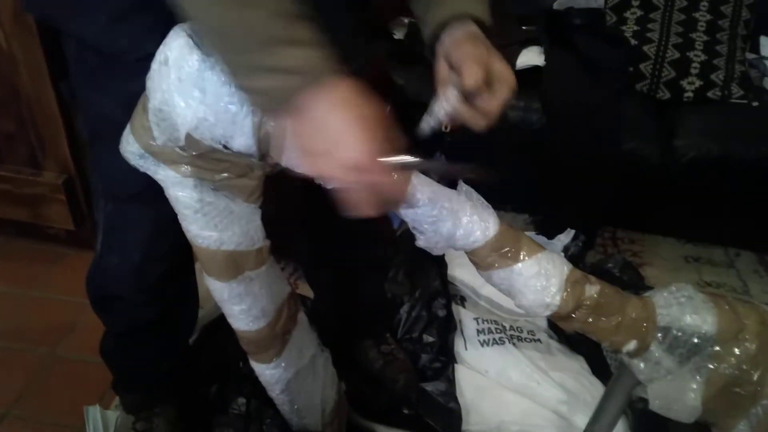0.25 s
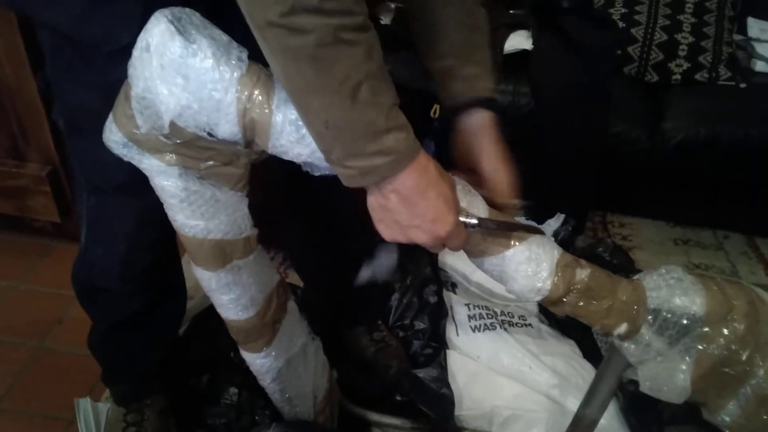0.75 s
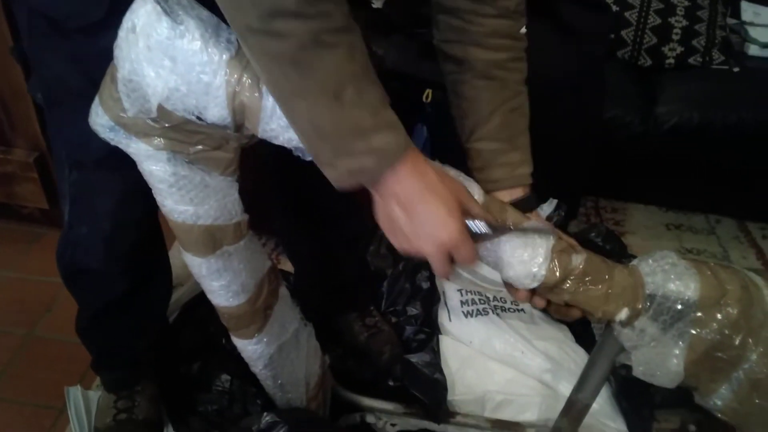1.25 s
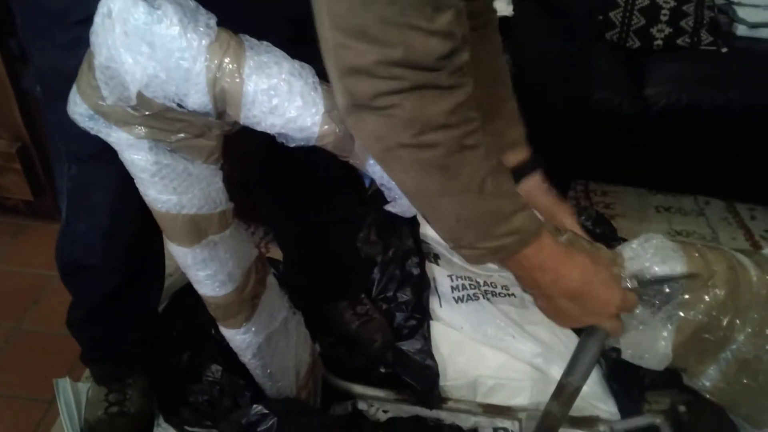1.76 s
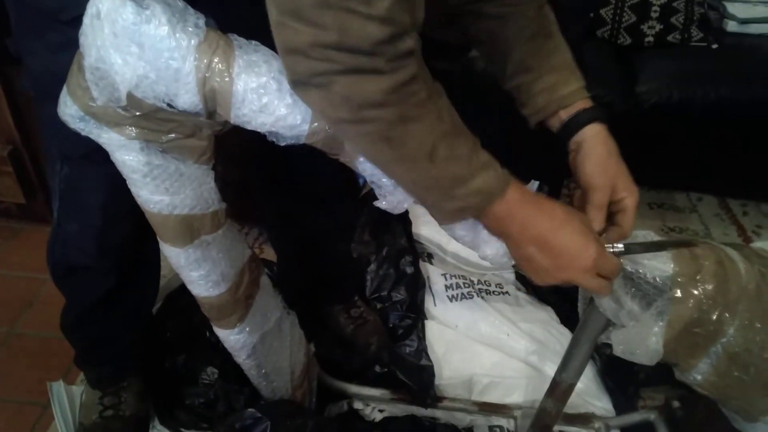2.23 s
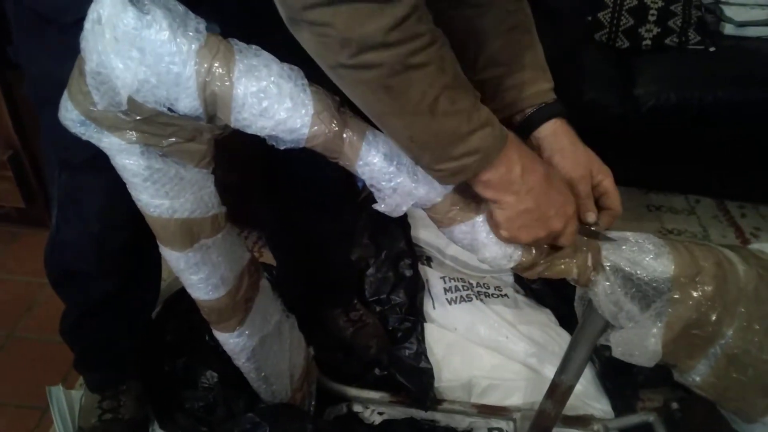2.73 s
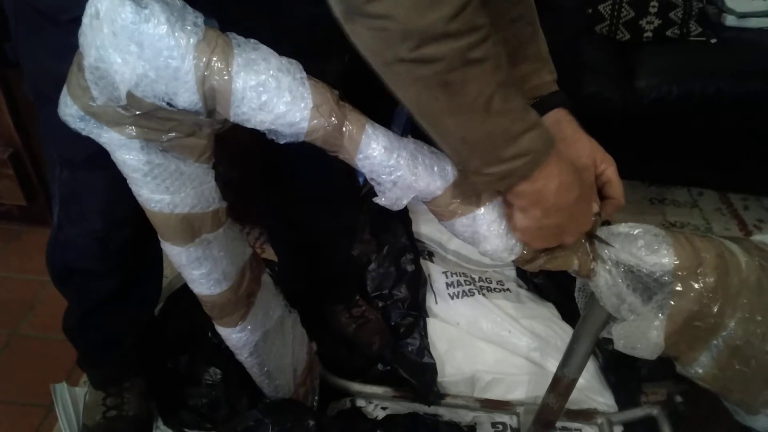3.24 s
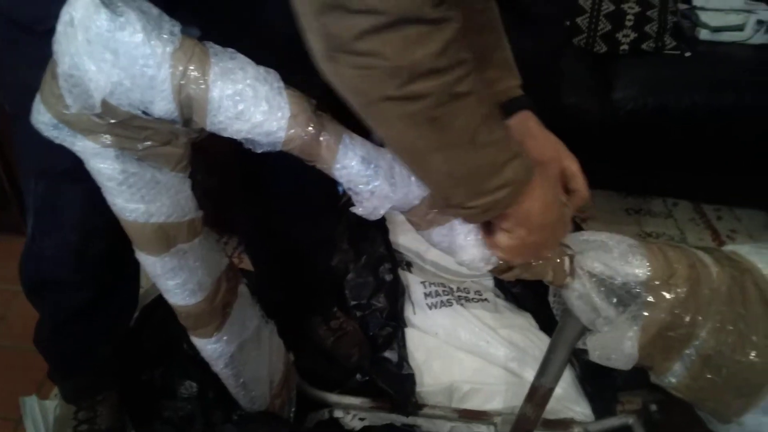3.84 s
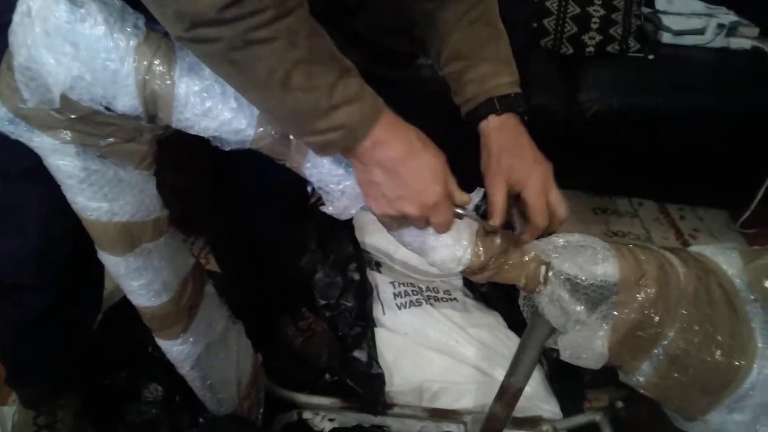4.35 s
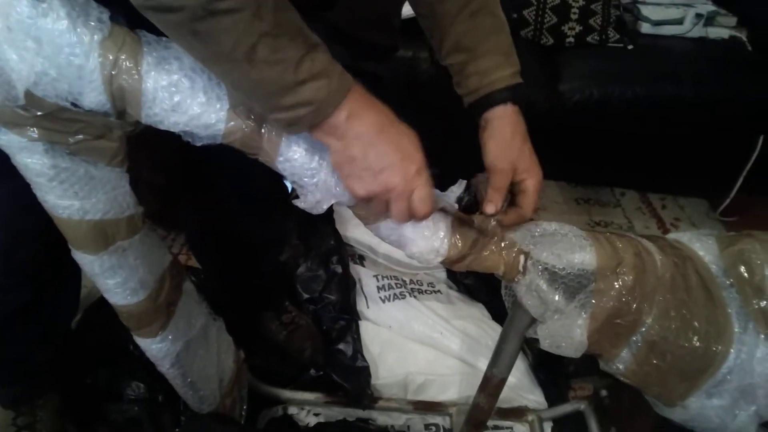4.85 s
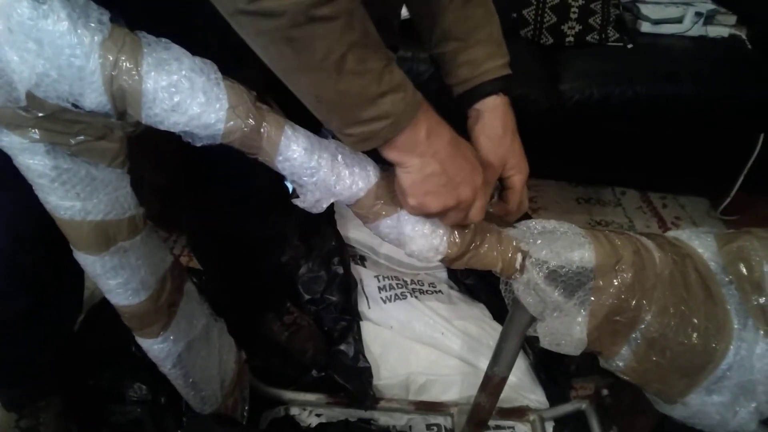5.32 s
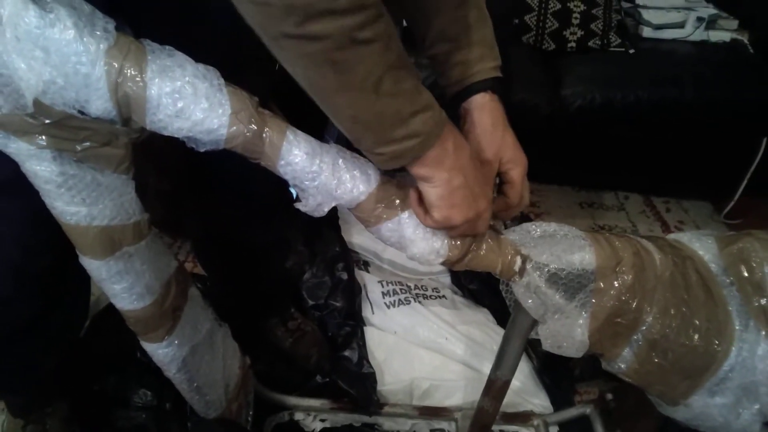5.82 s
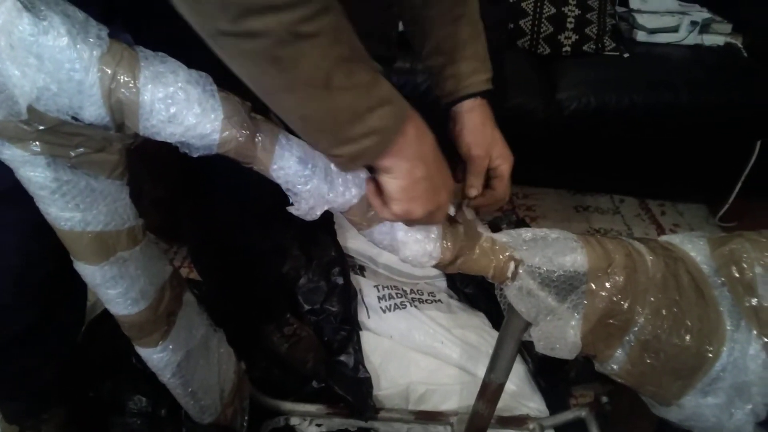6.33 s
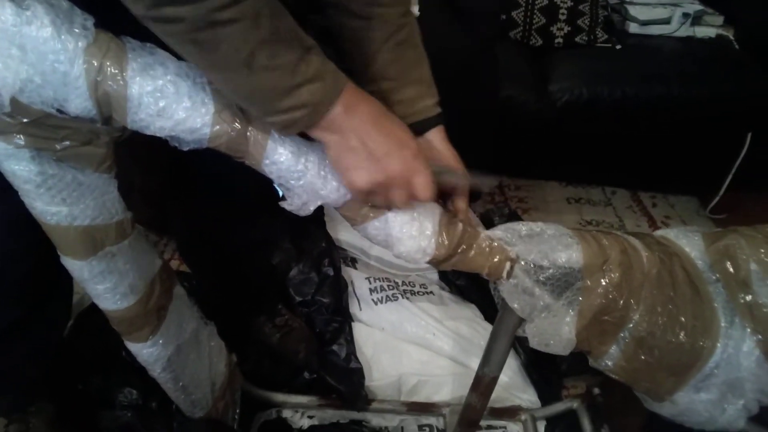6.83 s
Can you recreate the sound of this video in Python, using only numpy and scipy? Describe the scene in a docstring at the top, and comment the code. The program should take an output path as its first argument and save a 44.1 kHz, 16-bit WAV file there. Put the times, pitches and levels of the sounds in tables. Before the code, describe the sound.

In a small furnished living room, heard close, a blade works through packing tape and bubble wrap on a metal frame. A quick rustle and burst of snaps leads into a long, swelling crinkly cut with faint tape creaks. Short irregular strokes follow, with a cluster of loud sharp pops in the middle, then sparser crackles and more snaps towards the end, over dull padded bumps and low rumble.

```python
"""A brief rustle and a volley of sharp snaps open the scene, then a long crinkling cut and many short strokes.
A knife cuts packing tape and bubble wrap off a metal frame in a small living room.
Blade and fingers are streams of tiny buckling impulses; tape and bubbles give way as single sharp pulses.
The padded frame adds dull decaying bumps and low rumble; unsteady tones are tape creaks and one ringing knock.
Random reflections with a decaying tail answer the snaps, crinkles, bumps and tones."""
import sys
import numpy as np
from scipy import signal
from scipy.fft import rfft, irfft, next_fast_len
from scipy.io import wavfile
from scipy.ndimage import uniform_filter1d, map_coordinates

SR = 44100
rng = np.random.default_rng(int(sys.argv[2]) if len(sys.argv) > 2 else 0)


def store_pcm(level_fs):
    """Save levels as 16-bit WAV."""
    pcm = np.round(np.clip(level_fs, -1, 1) * 32767).astype(np.int16)
    wavfile.write(sys.argv[1], SR, np.atleast_2d(pcm).T)


N = 312228


def amp(db):
    """Decibels to linear gain."""
    return 10 ** (np.asarray(db) / 20)


def unit(x):
    """Scale a sound to rms 1."""
    return x / np.sqrt(np.mean(x ** 2) + 1e-20)


def along(points, hz):
    """Read (frequency [Hz], value) points on a log frequency axis."""
    f, v = np.transpose(points)
    return np.interp(np.log(hz + 1), np.log(f + 1), v)


def curves(rows):
    """One value per sample for each column after the time."""
    s, *cols = np.transpose(rows)
    return [np.interp(np.arange(N) / SR, s, c) for c in cols]


def wobble(rate):
    """A smooth random curve with rate knots a second."""
    knots = rng.standard_normal(int(N * rate / SR) + 4)
    return map_coordinates(knots, [np.arange(N) * rate / SR])


def filtered(x, response):
    """Shape a sound by a gain that depends on frequency."""
    m = next_fast_len(N + SR // 2)
    spectrum = rfft(x, m) * response(np.fft.rfftfreq(m, 1 / SR))
    return irfft(spectrum, m)[..., :N]


def noise(colour):
    """Steady noise of rms 1 with the given colour."""
    return unit(filtered(rng.standard_normal(N), lambda hz: amp(along(colour, hz))))


def pulse(colour, size=1024):
    """The sharpest causal (minimum-phase) pulse whose spectrum in dB is colour(Hz)."""
    gain = amp(colour(np.fft.rfftfreq(size, 1 / SR)))
    cepstrum = irfft(np.log(np.maximum(gain, 1e-6)))
    cepstrum[1:size // 2] *= 2
    cepstrum[size // 2 + 1:] = 0
    return irfft(np.exp(rfft(cepstrum)))


def add(track, start, sound):
    """Mix a sound into a track from a sample on."""
    part = track[..., start:start + sound.shape[-1]]
    part += sound[..., :part.shape[-1]]


def gesture(start, length, attack, release):
    """The envelope of one move of the hand, times in seconds: rise, hold, fade."""
    t = np.arange(N) / SR - start
    rise = np.clip(t / attack, 0, 1)
    return rise * np.exp(-np.clip((t - length) / release, 0, 30))


def room(room_db, build=0.0013, sparse=0.34, mixing=0.0044, size=20000):
    """A fresh (mid, side) path: direct sound, separate early reflections, then a dense decaying tail."""
    # the living room: (frequency [Hz], decay time t60 [s], colour of the reflections [dB])
    furnished = [(150, 0.27, 3), (686, 0.19, -1), (1940, 0.26, -2.5), (5000, 0.25, -2.5), (8770, 0.26, -1),
                 (13800, 0.21, 2.5)]
    hz, s, z = signal.stft(rng.standard_normal((2, size)), SR, nperseg=256)
    t60 = along([(f, decay) for f, decay, _ in furnished], hz)[:, None]
    level_db = along([(f, level) for f, _, level in furnished], hz)[:, None]
    tail = signal.istft(z * amp(level_db - 60 * s / t60), SR, nperseg=256)[1][:, :size]
    t = np.arange(size) / SR
    # uneven sample levels make the first reflections stand apart
    separate = np.exp(sparse * np.exp(-t / mixing) * (rng.standard_normal(size) - 1))
    tail *= (1 - np.exp(-t / build)) * separate
    tail *= amp(room_db) / np.linalg.norm(tail[0])  # reflections over the direct sound
    tail[0, 0] += 1  # direct sound
    return tail


def in_room(dry, room_db, size=8192):
    """A long sound in the room, scaled for equal power; the hands move, so the reflections keep changing."""
    out = np.zeros((2, N))
    for start in range(0, N, size):
        add(out, start, signal.fftconvolve(dry[None, start:start + size], room(room_db), axes=1))
    return out / np.sqrt(1 + amp(room_db) ** 2)


def quiet_room(floor_db=-75):
    """A steady coloured noise floor lies under everything."""
    # colour of the quiet room: (frequency [Hz], level per Hz [dB])
    floor = [(20, -25.5), (60, 8.5), (100, -7), (300, 7.5), (560, 2.5), (800, -9), (1000, 6), (1500, 1.5),
             (2500, -7), (5000, -6), (7000, -38), (14000, -31)]
    return amp(floor_db) * noise(floor)


def frame(rest_db=-79, fidget_db=3, push_rumble_db=-16, rocking_gain_db=-1, lurch_db=3):
    """The wrapped frame shuffles faintly under resting hands; each push shuffles it harder and adds rumble."""
    # hands leaning on the padded frame: (start [s], length [s], level [dB])
    pushes = [(0.187, 0.06, -69.5), (0.847, 0.036, -71), (1.152, 0.046, -59), (1.36, 0.12, -77),
              (1.687, 0.031, -72), (1.871, 0.073, -62.5), (1.939, 0.01, -46.5), (2.52, 0.045, -66),
              (3.46, 0.072, -65), (3.737, 0.18, -54.5), (4.046, 0.12, -64.5), (4.837, 0.047, -67),
              (5.844, 0.059, -63), (6.599, 0.023, -59), (6.748, 0.043, -62.5), (6.975, 0.039, -66)]
    # low rumble as the frame is pushed about: (time [s], level before the rocking gain [dB])
    rocking = [(0.0, -73), (0.15, -84), (0.45, -97), (0.55, -71), (0.8, -75.5), (1.3, -71), (1.45, -84),
               (1.7, -71), (2.0, -70), (2.1, -76.5), (2.55, -68), (2.7, -89), (3.14, -69), (3.3, -82),
               (3.5, -66.5), (3.62, -81.5), (4.12, -69.5), (4.3, -88), (5.2, -86), (5.4, -71), (5.65, -97),
               (5.92, -67), (6.4, -92), (6.86, -68), (7.08, -86)]
    # colour of the padding's shuffle: (frequency [Hz], level per Hz [dB])
    shuffle_colour = [(60, -24), (110, -19.5), (135, -1.5), (165, -11), (300, -4.5), (420, -9.5),
                      (700, -11.5), (2000, -34)]
    # colour of the frame's rumble: (frequency [Hz], level per Hz [dB])
    rumble_colour = [(20, -18.5), (42, -10), (53, -1), (61, 12), (72, 1.5), (95, -6), (130, -12.5),
                     (400, -58)]
    attack_s, release_s = 0.0062, 0.035
    power = sum((amp(db) * gesture(s, length, attack_s, release_s)) ** 2 for s, length, db in pushes)
    push = np.sqrt(power)
    shuffle = np.hypot(push, amp(rest_db + fidget_db * wobble(9.7)))
    rock = amp(curves(rocking)[0] + rocking_gain_db + lurch_db * wobble(9.7))
    rumble = np.hypot(amp(push_rumble_db) * push, rock)
    return shuffle * noise(shuffle_colour) + rumble * noise(rumble_colour)


def effort():
    """Hand work as gains of scrape, lower crinkle, upper crinkle and fizz; tighter film crinkles higher."""
    # the long cut along the tube: (time [s], crinkle [dB], scrape over it [dB], tautness [dB])
    cut = [(0.553, -69, 1, 12.5), (0.6, -58.5, -17, 3.5), (0.685, -63, -6, 7), (0.742, -57.5, -14, 2.5),
           (0.812, -73, 2.5, 7), (0.93, -52, -10.5, -1), (1.02, -68, -4.5, 4.5), (1.11, -62, 0, 8),
           (1.2, -48.5, -2, -4.5), (1.45, -48, -8, 0), (1.53, -71, -4, 4.5), (1.615, -72, -5, 10),
           (1.665, -45.5, -13, -2.5), (1.79, -48, -19, -8), (1.9, -44, -14, -2), (1.97, -46, -6, -4),
           (2.03, -51.5, -8, -1), (2.12, -47, -16.5, -5), (2.25, -60, -8, 9), (2.31, -73, -1, 6),
           (2.44, -79, 11, -2)]
    # short strokes on the wrap: (start [s], length [s], crinkle [dB], scrape over it [dB], tautness [dB])
    strokes = [(-0.02, 0.024, -66, 2, 12.5), (0.054, 0.037, -63, -9, -10), (0.144, 0.053, -52.5, 0.5, -1),
               (2.508, 0.037, -65, 4, 15.5), (2.608, 0.088, -56.5, -3, 13.5),
               (2.799, 0.064, -66.5, -1.5, -3), (2.872, 0.073, -52.5, -25, 4.5),
               (2.995, 0.019, -56.5, -2, 10.5), (3.13, 0.061, -60, -2, -4.5), (3.244, 0.06, -63, -7, -20),
               (3.433, 0.035, -51.5, -7, 5), (3.522, 0.18, -52, -12, -2.5), (3.736, 0.12, -44, -2, 0),
               (3.881, 0.08, -39, -3, 0), (3.97, 0.18, -53.5, -12, 3.5), (4.329, 0.019, -65.5, 6, 8.5),
               (4.417, 0.026, -68.5, 3, -3), (4.546, 0.055, -65.5, -1.5, 5.5), (4.628, 0.13, -63, -8, 9),
               (4.784, 0.077, -56.5, 6.5, 6), (5.022, 0.019, -56.5, -2.5, -8), (5.386, 0.015, -59, -5, 1),
               (5.424, 0.04, -52, -7.5, 7), (5.524, 0.026, -60, -3, 0.5), (5.638, 0.022, -55, 11, -9),
               (5.77, 0.045, -59.5, 0.5, 1), (5.895, 0.045, -49, -3, -3), (5.955, 0.067, -38.5, -27, -6.5),
               (6.066, 0.32, -63, -3, -0.5), (6.288, 0.17, -56.5, -9.5, 3.5),
               (6.589, 0.035, -55, -2.5, -3.5), (6.677, 0.08, -59, -4.5, -14), (6.727, 0.065, -45, -18, -4),
               (6.935, 0.23, -51.5, -4, 3)]
    attack_s, release_s = 0.02, 0.0045  # the grip builds, then lets go
    cut_fizz_db, stroke_fizz_db = -7, -9.5  # fizz relative to the upper crinkle
    slip_db, slip_rate = 1.92, 30  # the blade advances unevenly: depth, knots a second
    cut_start, cut_end = cut[0][0], cut[-1][0]
    moves = [(cut_start, cut_end - cut_start, *curves(cut), cut_fizz_db)]
    # after the long cut the wrap ticks faintly under the resting hands
    moves.append((cut_end, N / SR, -75, 3, -1, -10))
    moves += [(*row, stroke_fizz_db) for row in strokes]
    power = np.zeros((4, N))
    for start, length, db, scrape_db, taut_db, fizz_db in moves:
        level = amp(db) * gesture(start, length, attack_s, release_s)
        for k, band_db in enumerate([scrape_db, 0, taut_db, taut_db + fizz_db]):
            power[k] += (level * amp(band_db)) ** 2
    return np.sqrt(power) * amp(slip_db * wobble(slip_rate))


def buckles(rate, spread_db, clump_db, size=1400):
    """Tiny uneven impulses clump as film sticks and slips; the steady pull evens out longer spans."""
    happens = rng.random(N) < rate / SR
    size_db = spread_db * np.minimum(rng.standard_normal(N), 2.6)
    train = happens * rng.choice([-1, 1], N) * amp(size_db + clump_db * wobble(200))
    local_power = np.abs(uniform_filter1d(train ** 2, size))
    return train / np.sqrt(local_power + 1e-9)


def crinkle(scrape_hz=2800, taut_hz=4600, fizz_hz=7000, room_db=3):
    """Buckles ring through the film's colour; pressure brings out scrape, taut film upper crinkle and fizz."""
    # colour of the small buckles under the blade: (frequency [Hz], level per Hz [dB])
    rustle = [(100, -17), (330, -13.5), (570, -17), (760, 4.5), (950, -5), (1320, 2), (1800, -0.5),
              (2700, -4), (4300, -4), (5250, 2.5), (6100, -2.5), (7200, -8.5), (9000, -15), (14000, -24)]
    scrape, lower, upper, fizz = effort()
    train = buckles(rate=2300, spread_db=6, clump_db=5)
    fine = signal.fftconvolve(train, pulse(lambda hz: along(rustle, hz)))[:N]

    def below(hz, edge):
        return 1 / (1 + (hz / edge) ** 8)

    def band(lo, hi):
        return unit(filtered(fine, lambda hz: below(hz, hi) - below(hz, lo)))

    dry = scrape * band(1, scrape_hz)
    dry += lower * band(scrape_hz, taut_hz)
    dry += upper * band(taut_hz, fizz_hz)
    dry += fizz * band(fizz_hz, SR)
    return in_room(dry, room_db)


def fidgets(count=60, level_db=-60.5, spread_db=6, centre_hz=250, octaves=0.63):
    """Small finger bumps at random moments: (time [s], level before the bump gain [dB], pitch [Hz])."""
    rows = []
    for when, force, place in rng.random((count, 3)):
        db = level_db + spread_db * (2 * force - 1)
        hz = centre_hz * 2 ** (octaves * (2 * place - 1))
        rows.append((when * N / SR, db, hz))
    return rows


def bumps(t60=0.082, attack=0.0026, gain_db=-1, overtone=1.3, overtone_db=-7):
    """Padding softens each firm bump or small fidget and damps the frame's two partials quickly."""
    # knuckles and knife handle on the padded frame: (time [s], level before the gain [dB], pitch [Hz])
    firm = [(0.193, -44.5, 172), (0.306, -58, 204), (1.226, -48, 364), (1.42, -48.5, 199),
            (1.714, -54, 152), (1.954, -38.5, 225), (3.101, -57, 147), (3.463, -45, 186),
            (3.764, -32.5, 354), (4.122, -48, 238), (4.841, -46, 465), (5.035, -52, 272),
            (5.656, -49.5, 415), (5.858, -43, 490), (6.749, -44, 392)]
    dry = np.zeros(N)
    t = np.arange(SR // 4) / SR
    for s, db, hz in firm + fidgets():
        ring = np.sin(2 * np.pi * hz * t)
        ring += amp(overtone_db) * np.sin(2 * np.pi * hz * overtone * t)
        decay = amp(db + gain_db - 60 * t / t60)
        add(dry, round(s * SR), decay * (1 - np.exp(-t / attack)) * ring)
    return in_room(dry, room_db=-6)


def snaps(gain_db=8.5, flutter_db=-8, flutter_s=0.00016):
    """Film giving way is a sharp pulse; a larger patch has more knock and body, a cleaner break more edge."""
    # tape and bubbles giving way:
    # (time [s], level before the gain [dB], body [dB], edge [dB], reflections over direct sound [dB])
    breaks = [(0.158, -13.5, -7, -7, 7.5), (0.1642, -10, -5, 1, -1), (0.1837, -9, -8, -6, -5),
              (0.201, -13.5, 1.5, -1, -1.5), (1.4482, -21.5, -4, -2, 7), (1.9539, -13, 2.5, -2, 9),
              (2.499, -37.5, -8, 8, 12), (2.5272, -36.5, -5, 11, 11), (2.6093, -23.5, 0.5, 3, 9.5),
              (2.6197, -25, 3, 7, -1), (2.6495, -23.5, 4, -10, -6), (2.8461, -27.5, -8, 9, 3.5),
              (2.8831, -21.5, -7.5, 12, 4.5), (3.011, -15.5, -23, 8.5, -9.5), (3.1105, -37.5, -16, 7, 4),
              (3.189, -28, -3, -13, 0), (3.389, -42, -23, 8.5, 13.5), (3.4542, -29.5, 0, 9, 19),
              (3.4654, -17.5, 13.5, 25.5, -10), (3.4666, -1, 2, -1.5, 4), (3.634, -9, -9, 2.5, 0.5),
              (3.7053, 1.5, -17, -3.5, -0.5), (3.7214, -3, 3, -2, 3), (3.7583, -6.5, -15, -1, 4),
              (3.765, -3, 5.5, -3, 4), (3.879, -2.5, 2.5, -7, 7), (4.0736, -30, 3.5, 17.5, 9.5),
              (4.73, -20, -23, 8, -3), (4.8005, -27.5, 8.5, 11, -7), (4.836, -15.5, 4.5, 3, -6),
              (4.8401, -9, -9, -3, 0), (5.1533, -36.5, -18, 13, 2), (5.4023, -13, 1, 0, 7),
              (5.4161, -8, -36, 1.5, -1.5), (5.4952, -19, -22, -4, -6), (5.6531, -19.5, 13, -14, -0.5),
              (5.859, -16.5, 17, -3.5, 3), (5.9439, -1.5, -1.5, -2.5, 8), (6.1349, -23.5, -18, -10, -14),
              (6.1771, -35.5, -3, -19, 8), (6.2774, -6.5, -7, -10, 2), (6.2792, -0.5, -3, -5, 0.5),
              (6.3954, -21.5, -5, 0, -17), (6.4266, -21, -1, 2, 4.5), (6.751, -16, 1, -7, 5.5),
              (6.7879, -14, -20, -26, -2), (6.9439, -20, -2.5, 0, 7)]
    # colour of a snap of the film: (frequency [Hz], level per Hz [dB])
    film = [(100, -38.5), (300, -28.5), (540, -26.5), (690, -7), (850, -11.5), (1050, -5), (1600, -6),
            (2600, -5.5), (3800, -2), (5000, 2), (5900, -6.5), (7000, -11), (9000, -18.5), (14000, -30)]
    out = np.zeros((2, N))
    t = np.arange(SR // 200) / SR
    for s, db, body_db, edge_db, room_db in breaks:
        knock = [(700, body_db), (1300, body_db), (2200, 1.13 * body_db)]
        tint = knock + [(3800, 0), (5800, 0.0022), (8500, edge_db)]
        crack = pulse(lambda hz: along(film, hz) + along(tint, hz))
        # nearby folds scatter the pulse for about a millisecond
        flutter = rng.standard_normal(len(t)) * t * np.exp(-t / flutter_s)
        path = room(room_db)
        add(path[0], 0, amp(flutter_db) * flutter / np.linalg.norm(flutter))
        add(out, round(s * SR), amp(db + gain_db) * signal.fftconvolve(crack[None], path, axes=1))
    return out


def creaks_and_knock(room_db=1):
    """Short gliding tones of unsteady pitch and level: tape sticking and slipping, and one ringing knock."""
    # tape creaks against the blade, and one short ringing knock at 6.742 s:
    # (start [s], length [s], first pitch [Hz], last pitch [Hz], level [dB])
    tones = [(1.25, 0.36, 808, 769.4, -59.5), (1.433, 0.15, 1000, 889, -61), (1.48, 0.206, 1090, 1168, -61),
             (0.84, 0.23, 1144, 1114, -66.5), (1.17, 0.36, 3480, 3560, -50.5),
             (2.198, 0.07, 1306, 1220, -62.5), (2.615, 0.049, 1347, 1225, -52.5),
             (3.241, 0.053, 1150, 1496, -63), (3.262, 0.041, 2110, 2255, -55),
             (4.066, 0.018, 1100, 1160, -46), (4.638, 0.033, 1253, 1290, -60.5),
             (6.236, 0.042, 1940, 2220, -55), (6.742, 0.014, 1137, 1130, -40.5)]
    dry = np.zeros(N)
    unsteady = 1 + .12 * wobble(500) + .05 * wobble(40)  # pitch factor
    flutter = amp(5 * wobble(220) + 2 * wobble(30))  # uneven level
    for s, length, first_hz, last_hz, db in tones:
        start = round(s * SR)
        u = np.linspace(0, 1, max(round(length * SR), 2))
        span = slice(start, start + len(u))
        hz = (first_hz + (last_hz - first_hz) * u) * unsteady[span]
        phase = 2 * np.pi * np.cumsum(hz) / SR
        swell = np.sqrt(2 * np.abs(np.sin(np.pi * u)))
        add(dry, start, amp(db) * swell * unit(flutter[span]) * np.sin(phase))
    return in_room(dry, room_db)


def scene():
    """Everything sits in the middle; mainly the treble of the reflections spreads sideways."""
    # stereo width of the reflections: (frequency [Hz], side over mid [dB])
    width = [(2900, -71.5), (3600, -67), (4500, -44.5), (6000, -8.5), (9000, -3.5), (14000, -4)]
    mid, side = crinkle() + bumps() + snaps() + creaks_and_knock()
    mid = mid + quiet_room() + frame()
    side = filtered(side, lambda hz: amp(along(width, hz)))
    return np.array([mid + side, mid - side])


def record(dry, top_hz=14400):
    """A very steep low-pass ends the treble at the band limit."""
    return filtered(dry, lambda hz: 1 / np.sqrt(1 + (hz / top_hz) ** 260))


dry = scene()
out = record(dry)
store_pcm(out)
```